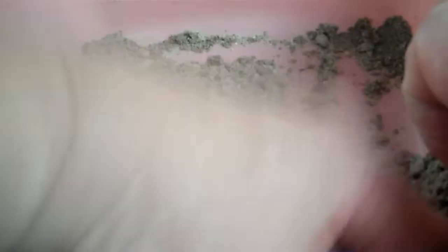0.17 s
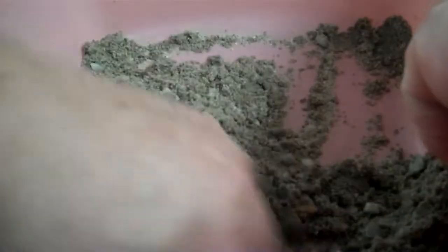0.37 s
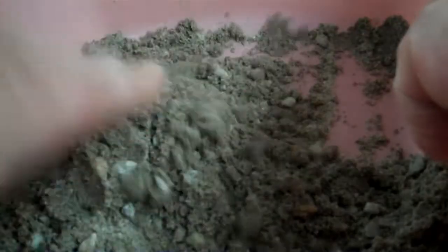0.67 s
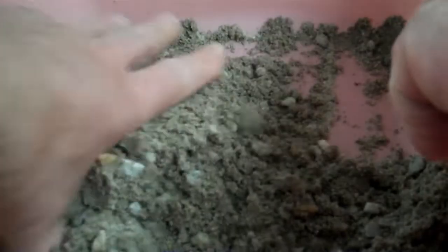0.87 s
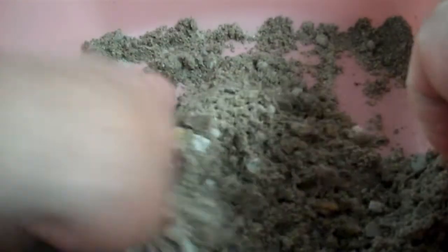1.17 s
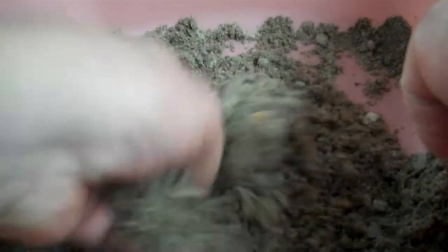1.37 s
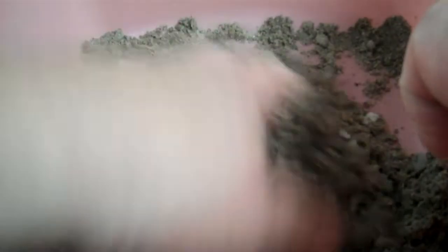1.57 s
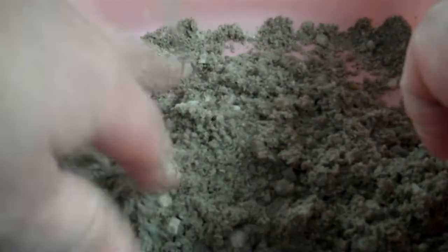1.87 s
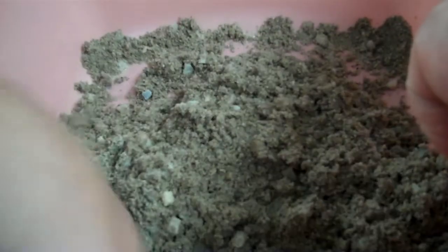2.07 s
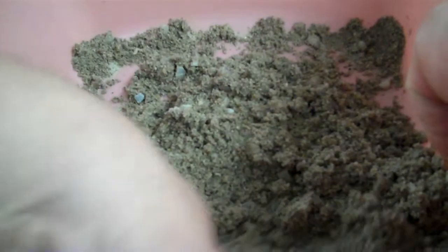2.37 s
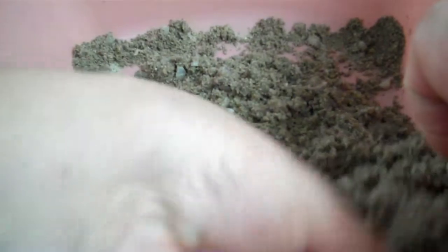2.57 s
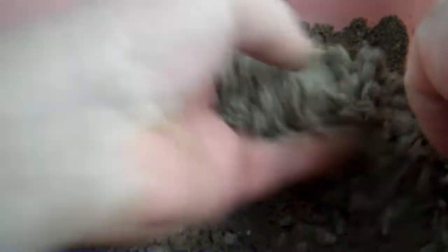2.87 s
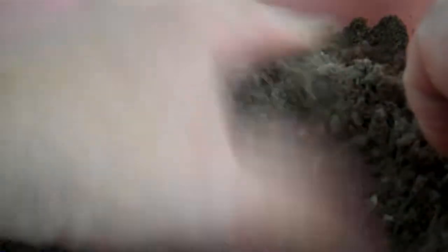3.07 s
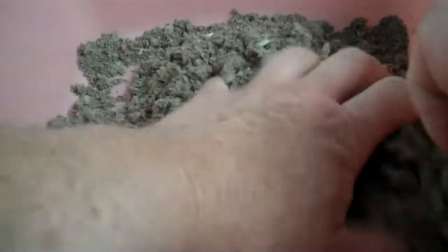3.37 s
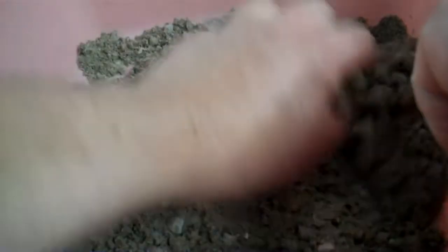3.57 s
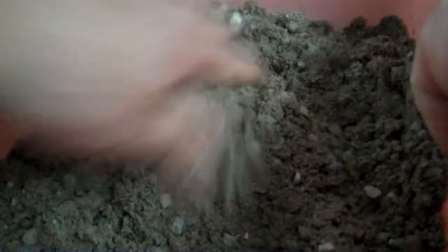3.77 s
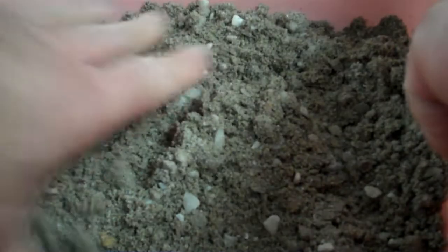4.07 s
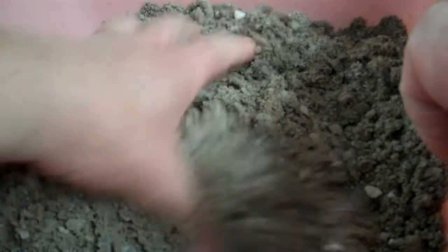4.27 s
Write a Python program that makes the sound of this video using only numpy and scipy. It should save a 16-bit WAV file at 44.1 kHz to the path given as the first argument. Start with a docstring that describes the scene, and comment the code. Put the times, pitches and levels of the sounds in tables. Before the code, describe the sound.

Gritty strokes through wet gravelly sand, heard dry and near: fine bright hiss over coarser crunch, swelling and dying in uneven bursts. Stones pinch and crack, pebbles tick together and knock briefly on the hollow plastic bucket, and the hand lands with dull thumps. A busy burst of cracks comes near four seconds, then a final push. Quiet outdoor air lies underneath; low overload pops lean left.

```python
"""Damp sand and gravel hiss and crunch under a hand that squeezes and stirs them in a plastic bucket, heard close up.
Countless grains slip under each stroke; pebbles click together and knock on the bucket, whose hollow rings briefly.
Stones crack and the hand thumps the load, over a faint steady wash of outdoor air.
Two microphone ports lift parts of the treble; the hardest cracks overload them with a low pop, mostly on the left."""
import sys
import numpy as np
from scipy import signal
from scipy.fft import rfft, irfft, next_fast_len
from scipy.io import wavfile
from scipy.ndimage import map_coordinates

SR = 44100
rng = np.random.default_rng(int(sys.argv[2]) if len(sys.argv) > 2 else 0)


def store_wav(level_fs):
    """Save 16-bit WAV to argv[1]."""
    pcm = np.round(np.clip(np.atleast_2d(level_fs), -1, 1) * 32767)
    wavfile.write(sys.argv[1], SR, pcm.T.astype(np.int16))


N = 195054  # samples in the scene
TAPS = 2048  # samples in one contact or filter response

# Spectrum of a bright stone snap or falling crumb: frequency_hz, relative_level_db
SNAP_SPECTRUM = [(300, -3), (1500, -27.5), (3000, -3.5), (4300, 1), (6000, 6.5), (8000, 1.5), (11000, 1.5),
                 (14000, -4)]
# Spectrum of a low pop: frequency_hz, relative_level_db
POP_SPECTRUM = [(20, 0.5), (150, 2.5), (350, 2), (700, 1), (1500, -5.5), (5000, -31)]


def amp(db):
    """Amplitude ratio of a level in dB."""
    return 10 ** (np.asarray(db) / 20)


def read(points, size):
    """A table over frequency, read at the bins of a transform of this size."""
    hz, value = np.transpose(points)
    bins_hz = np.fft.rfftfreq(size, 1 / SR)
    return np.interp(np.log(bins_hz + 1), np.log(hz), value)


def unit(x):
    """Scales to a mean energy of 1 per channel."""
    return x / np.sqrt(np.mean(np.sum(x ** 2, -1)) + 1e-20)


def ring(points):
    """The causal, minimum-phase impulse response that has this spectrum."""
    cepstrum = irfft(np.log(amp(read(points, TAPS))))
    # fold the cepstrum onto positive time
    cepstrum[1:TAPS // 2] *= 2
    cepstrum[TAPS // 2 + 1:] = 0
    return irfft(np.exp(rfft(cepstrum)))


def convolve(x, response):
    """Passes each channel through a response and keeps the original length."""
    full = signal.oaconvolve(np.atleast_2d(x), np.atleast_2d(response), axes=1)
    return full[:, :np.shape(x)[-1]]


def add(mix, s, sound):
    """Lays a sound into the mix from this second on."""
    part = mix[:, max(round(s * SR), 0):][:, :sound.shape[1]]
    part += sound[:, :part.shape[1]]


def wander(per_s):
    """Random values joined by straight lines, with spread about 1, this many per second."""
    at = np.arange(N) * per_s / SR
    return np.interp(at, np.arange(N // 8), rng.standard_normal(N // 8)) * np.sqrt(3 / 2)


def contact(spectrum, crack_s, echo_db, echo_s):
    """One contact at both ports: a short noisy crack and its scatter off the bucket's walls."""
    # Likeness of the sound at the two ports: frequency_hz, likeness (0-1)
    port_likeness = [(100, 1), (700, 0.91), (2400, 0.95), (3300, 0.87), (4200, 0.25), (5400, 0.82),
                     (6500, 0.53), (7400, 1), (8600, 0), (9600, 0.65)]
    t = np.arange(TAPS) / SR
    shape = np.exp(-t / crack_s) + amp(echo_db) * np.exp(-t / echo_s)
    left, other = rfft(shape * rng.standard_normal((2, TAPS)))
    alike = np.clip(read(port_likeness, TAPS), 0, 1)
    right = alike * left + np.sqrt(1 - alike ** 2) * other
    pair = irfft(np.array([left, right]))
    return unit(convolve(pair, ring(spectrum)))


def bucket(damping, uneven_db):
    """The loaded bucket rings in decaying modes; each place of impact weights them differently."""
    # Modes of the loaded bucket: frequency_hz, relative_level_db, t60_s at damping 1
    modes = [(380, -23, 0.053), (534, -8.5, 0.049), (662, -11, 0.047), (762, 1.5, 0.055), (841, 3, 0.046),
             (1110, -2.5, 0.025), (1208, -6.5, 0.053), (1277, 5, 0.017)]
    hz, db, t60 = np.transpose(modes)[:, :, None]
    t = np.arange(2 * TAPS) / SR
    sign = rng.choice([-1, 1], hz.shape)
    weight = sign * amp(db + uneven_db * rng.standard_normal(hz.shape))
    decay = amp(-60 * t * damping / t60)
    return unit(np.sum(weight * decay * np.sin(2 * np.pi * hz * t), 0)[None])


def air(level_db):
    """A faint steady wash of quiet outdoor air behind the work: filtered noise, independent at each port."""
    # Spectrum of the air: frequency_hz, relative_level_db
    air_spectrum = [(20, -13), (60, -1), (130, 2), (250, -2), (700, 0), (2000, -10), (6000, -19),
                    (14000, -16.5)]
    wash = convolve(rng.standard_normal((2, N)), ring(air_spectrum))
    return amp(level_db) * np.sqrt(N) * unit(wash)


def thumps():
    """The soft hand lands on the heap and pushes the whole load against the bucket's floor."""
    # Landings of the hand: start_s, level_db
    landings = [(0.308, -1), (0.334, 5), (0.846, -4.5), (3.348, 0), (3.969, -8)]
    # Spectrum of a landing: frequency_hz, relative_level_db
    thump_spectrum = [(40, -21), (110, -8), (170, -3), (280, -9), (365, 6.5), (460, 0.5), (640, -1.5),
                      (1250, 1), (4000, -65)]
    out = np.zeros((2, N))
    for s, db in landings:
        add(out, s, amp(db) * contact(thump_spectrum, crack_s=0.0069, echo_db=-9, echo_s=0.039))
    return out


def stone(hz, snap_db, clack_db, knock_db):
    """One stone's sound: a bright snap, a duller clack at its pitch and a knock on the bucket."""
    # Spectrum of a clack: multiple_of_pitch, relative_level_db
    clack_spectrum = [(.05, -30), (.25, -11.5), (.5, -5), (.8, 3), (1, 1.5), (1.3, -0.5), (1.8, -7.5),
                      (3, -8), (6, -34.5)]
    body = [(multiple * hz, db) for multiple, db in clack_spectrum]
    snap = contact(SNAP_SPECTRUM, crack_s=0.0016, echo_db=-21.5, echo_s=0.0044)
    clack = contact(body, crack_s=0.00038, echo_db=-3, echo_s=0.0025)
    out = amp([[knock_db], [knock_db]]) * bucket(damping=0.93, uneven_db=0.5)  # same at both ports
    add(out, 0, amp(snap_db) * snap)
    add(out, 0, amp(clack_db) * clack)
    return out


def pebbles(level_db):
    """Loose pebbles strike heap and bucket; the bigger and lower one is, the harder it knocks the bucket."""
    # Strikes: start_s, level_db before the common level, pitch_hz, snap_db relative to the strike
    strikes = [(0.1614, 0.5, 2400, -8), (0.176, -4, 2920, -15), (0.2922, 11.5, 2380, -11),
               (0.2992, 11, 1610, -9), (0.308, 7.5, 1100, -12), (0.719, -7, 2000, -1.5),
               (0.7505, -9, 2150, 5), (0.7635, -0.5, 2000, 4.5), (0.7756, 7, 2220, 5.5),
               (0.8167, 5.5, 3500, 1), (0.8479, -2, 795, 3), (1.4673, 12.5, 1520, -11),
               (1.567, -3, 2150, -17), (1.6522, -4, 2400, -1), (1.705, 0.5, 1940, -8),
               (1.7387, 2, 1046, -2), (1.768, -4, 3650, -6), (2.0479, 3.5, 1740, -3),
               (2.0874, -.5, 2760, -8), (2.094, -0.5, 2880, -6), (2.1387, -4.5, 1920, 12),
               (2.2078, 13, 3260, -4), (2.3076, 4, 2830, 2), (3.2212, -3.5, 2260, -14),
               (3.2298, -2, 2100, -17), (3.2514, -2, 2700, 2), (3.2577, 1.5, 2650, -7),
               (3.2774, -8, 915, 3), (3.3474, 1, 1320, 0), (3.9023, -4, 1800, -1.5), (3.953, 12, 1060, -3),
               (3.9644, 13.5, 820, -6), (3.9767, 4, 1200, -1), (4.007, 2, 1390, -14), (4.018, 0, 1430, -9),
               (4.0318, 2, 1500, 2)]
    knock_at_1khz_db, knock_db_per_octave = -1, -8  # relative to the strike
    out = np.zeros((2, N))
    for s, db, hz, snap_db in strikes:
        knock_db = knock_at_1khz_db + knock_db_per_octave * np.log2(hz / 1000)
        add(out, s, stone(hz, db + snap_db, db, db + knock_db))
    return amp(level_db) * out


def cracks(snap_db, pop_db, pop_right_db):
    """Pinched stones slip with a bright crack; the excess over the overload level adds a low pop, mostly left."""
    # Slips of pinched stones: start_s, crack_db (snap, clack and knock are set relative to it)
    slips = [(0.2728, -2.5), (0.2922, 12.5), (0.304, 3.5), (0.3215, 6.5), (0.7883, 3.5), (0.8107, 8.5),
             (0.8477, 4), (0.8638, 12.5), (0.9383, 1.5), (1.1666, 10), (1.4669, 6.5), (1.8634, -1),
             (2.174, -1), (2.2077, 16.5), (2.4482, 8.5), (2.579, 7), (3.3108, -4.5), (3.4874, 7),
             (3.9518, -2), (3.9609, 11.5), (3.9658, 13.5), (4.0453, 15.5), (4.057, 8.5), (4.1949, 10),
             (4.2013, 9.5), (4.2126, 0.5), (4.4067, 11)]
    pitch_hz, clack_db, knock_db = 2400, -15.5, -17.5  # levels relative to the crack
    overload_db = 4.5  # crack level above which the pop appears
    out = np.zeros((2, N))
    low_pop = unit(ring(POP_SPECTRUM)) * amp([[pop_db], [pop_db + pop_right_db]])
    for s, db in slips:
        add(out, s, stone(pitch_hz, db + snap_db, db + clack_db, db + knock_db))
        excess = max(amp(db) - amp(overload_db), 0)
        add(out, s, -excess * low_pop)
    return out


def grains(spectrum, per_s, spread_db, crack_s, echo_db, echo_s, count=16):
    """Slips of many sizes at random moments, from a number of places in the heap; about rms 1."""
    size = amp(spread_db * np.minimum(rng.exponential(1, N), 4.5)) * rng.choice([-1, 1], N)
    happens = rng.random(N) < per_s / SR
    slips = unit(size * happens) * np.sqrt(N)
    place = rng.integers(0, count, N)
    out = np.zeros((2, N))
    for k in range(count):
        out += convolve(slips * (place == k), contact(spectrum, crack_s, echo_db, echo_s))
    return out


def shifting(x, depth_db, span_s, span_hz):
    """The fingers keep changing the gaps that the sound leaves by, so its colour drifts; rms 1."""
    hz, t, z = signal.stft(x, SR, nperseg=512)
    # a random map of gains over log frequency and time
    knots = rng.standard_normal((400, 1000))
    where = np.meshgrid(np.log1p(hz / span_hz) * 4, t / span_s, indexing="ij")
    z = z * amp(depth_db * map_coordinates(knots, where, order=1, mode="wrap"))
    coloured = signal.istft(z, SR, nperseg=512)[1][:, :N]
    return np.sqrt(N) * unit(coloured)


def effort():
    """Strokes build up, hold and die away, adding in power; gives the fine and coarse levels in dB."""
    # Pushes through the sand: start_s, rise_s, hold_s, release_s, grit_db (before the layer levels),
    # crunch_db relative to the grit
    strokes = [(0.0, 0.001, 0.022, 0.15, -10, -16.5), (0.041, 0.071, 0.031, 0.097, -26.5, 0),
               (0.277, 0.013, 0.013, 0.23, -25, -0.5), (0.358, .005, 0.16, 0.096, -15, -9),
               (0.738, 0.027, 0.031, 0.64, -30, -6), (0.94, 0.018, 0.59, 0.064, -23.5, -6.5),
               (1.043, 0.12, 0.005, 0.13, -12.5, -19), (1.212, 0.1, 0.034, 0.064, -17.5, -17),
               (1.748, 0.017, 0.12, 0.32, -28.5, -10), (1.832, 0.097, 0.036, 0.071, -25, -8.5),
               (2.025, 0.023, 0.02, 0.075, -25.5, -3.5), (2.126, 0.0025, 0.0078, 0.11, -26, -6),
               (2.178, 0.075, 0.057, 0.14, -19, -8), (2.348, 0.048, 0.031, 0.045, -16, -9.5),
               (2.389, 0.071, 0.54, 0.12, -21, -7), (2.45, 0.051, 0.094, 0.034, -16.5, -9),
               (2.827, 0.067, 0.034, 0.055, -24, 1.5), (2.961, 0.04, 0.033, 0.045, -30, 7),
               (3.217, 0.004, 0.057, .035, -32, -3.5), (3.341, 0.0044, 0.098, .2, -26, -8.5),
               (3.43, 0.048, 0.15, 0.14, -14, -10), (3.661, 0.047, .03, .12, -31.5, 1),
               (3.948, 0.0028, 0.048, 0.38, -26, -8), (4.19, 0.0025, 0.009, 0.062, -29, -3),
               (4.31, 0.067, 0.029, 0.071, -13, -15)]
    release_db = 24.5  # how far a stroke dies away in its release time
    settle_db, settle_coarse_db = -44, -6.5  # the heap never quite stops settling; coarse relative to fine
    t = np.arange(N) / SR
    fine = amp(settle_db) ** 2
    coarse = amp(settle_db + settle_coarse_db) ** 2
    for start, rise, hold, release, db, coarse_db in strokes:
        late = np.maximum(t - start - rise - hold, 0)
        push = np.clip((t - start) / rise, 0, 1) * amp(db - release_db * late / release)
        fine = fine + push ** 2
        coarse = coarse + (push * amp(coarse_db)) ** 2
    return 10 * np.log10(fine), 10 * np.log10(coarse)


def sand(grit_db, crunch_db, hollow_db, clump_db, crunch_clump_db, crumbs_db, crumbs_follow,
         crackle_db, crackle_follow, gravel_db):
    """The hand shears the sand, which gives way in clumps: fine grit hisses, coarse grains crunch."""
    # Spectra of one contact of fine grit, coarse grain and small gravel: frequency_hz, relative_level_db
    grit_spectrum = [(300, -36.5), (1500, -23), (3000, -6.5), (4300, -1.5), (6000, 5.5), (8000, 4.5),
                     (11000, -3), (14000, -7)]
    crunch_spectrum = [(60, -45), (250, -20.5), (520, -12), (750, -4), (1100, -1), (1600, 0), (2200, 1.5),
                       (3300, -0.5), (4800, -4), (9000, -44)]
    gravel_spectrum = [(200, -28.5), (600, -6), (1200, -3), (2300, -1), (3500, -6), (6000, -3.5), (9000, 1),
                       (14000, -55)]
    level, coarse = effort()
    clumps = (wander(per_s=81) + wander(per_s=740)) / np.sqrt(2)

    grit = grains(grit_spectrum, per_s=5000, spread_db=3.0, crack_s=0.00037, echo_db=-15.0, echo_s=0.015)
    grit = shifting(grit, depth_db=2.5, span_s=0.027, span_hz=886)
    grit = grit * amp(level + grit_db + clump_db * clumps)

    crunch = grains(crunch_spectrum, per_s=2400, spread_db=2.5, crack_s=0.00056, echo_db=-8.5, echo_s=0.0032)
    # the coarse grains sound the bucket, which the hand damps now more, now less
    hollow = convolve(crunch.mean(0), bucket(damping=1.0, uneven_db=0))
    hollow = amp(hollow_db) * shifting(hollow, depth_db=5.5, span_s=0.048, span_hz=162)
    crunch = shifting(crunch, depth_db=3.5, span_s=0.035, span_hz=371) + hollow
    crunch = crunch * amp(coarse + crunch_db + crunch_clump_db * clumps)

    # loose crumbs keep falling between the strokes
    crumbs = grains(SNAP_SPECTRUM, per_s=84, spread_db=6.0, crack_s=0.00027, echo_db=-20, echo_s=0.0036)
    crumbs = crumbs * amp(crumbs_db + crumbs_follow * level)

    # hard strokes bring a low crackle on the left only
    crackle = grains(POP_SPECTRUM, per_s=250, spread_db=8.0, crack_s=0.0001, echo_db=-58, echo_s=0.002)
    crackle = crackle * amp(crackle_db + crackle_follow * level) * [[1], [0]]

    # bits of gravel tick one by one within the crunch
    gravel = grains(gravel_spectrum, per_s=130, spread_db=2.0, crack_s=0.0007, echo_db=-21, echo_s=0.0017)
    gravel = gravel * amp(coarse + gravel_db)
    return grit + crunch + gravel + crumbs + crackle


def scene():
    """Strokes through the sand, cracks, pebbles, the hand's thumps and the air around them."""
    stirring = sand(grit_db=-0.98, crunch_db=-1.5, hollow_db=-11.5, clump_db=1.0, crunch_clump_db=0.5,
                    crumbs_db=-23.5, crumbs_follow=0.62, crackle_db=-7.5, crackle_follow=2.58, gravel_db=-6.5)
    clicks = cracks(snap_db=-1.0, pop_db=0.5, pop_right_db=-43) + pebbles(level_db=-1.84)
    return stirring + clicks + thumps() + air(level_db=-56.5)


def record(dry):
    """Each port colours the treble, the right a little late; peaks round off near full scale, then a low-pass."""
    # Response of each microphone port: frequency_hz, gain_db
    left_port = [(900, -1.5), (4000, 1.5), (6000, 0), (7150, 7.5), (7900, 4.5), (8600, -0.5), (10000, -6),
                 (14000, -5)]
    right_port = [(900, -1), (4000, 2), (6200, 4), (7300, -5), (9000, -13), (13000, -23.5)]
    # How far the right port lags: frequency_hz, phase_rad
    port_lag = [(2300, 0.034), (3700, 0.36), (5300, 0.55), (6400, .03)]
    edge_hz, ceiling = 14400, 0.88  # ceiling in parts of full scale
    size = next_fast_len(N + TAPS)
    ports = amp([read(left_port, size), read(right_port, size)])
    lag = np.exp(-1j * np.outer([0, 1], read(port_lag, size)))
    heard = irfft(rfft(dry, size) * ports * lag, size)[:, :N]
    limited = heard / (1 + (heard / ceiling) ** 6) ** (1 / 6)
    low_pass = signal.firwin(255, edge_hz, window=("kaiser", 8), fs=SR)
    return signal.oaconvolve(limited, low_pass[None], "same")


dry = scene()
out = record(dry)
store_wav(out)
```